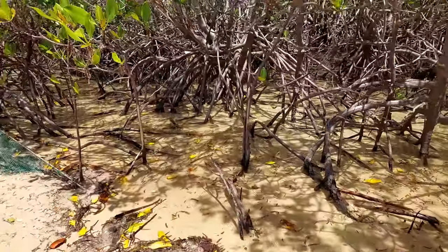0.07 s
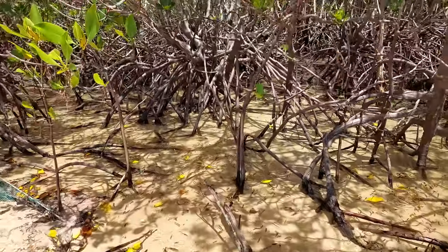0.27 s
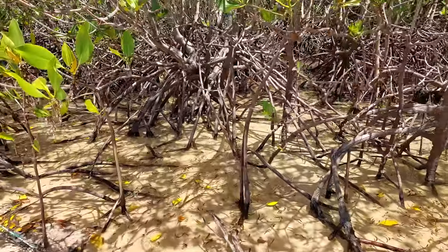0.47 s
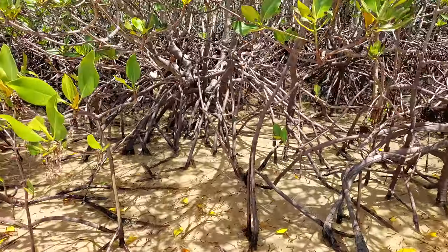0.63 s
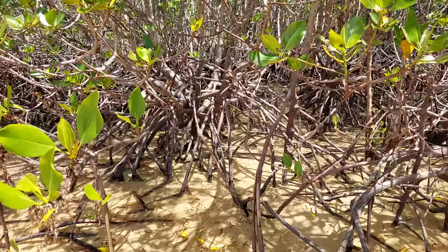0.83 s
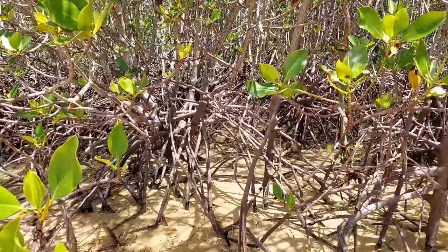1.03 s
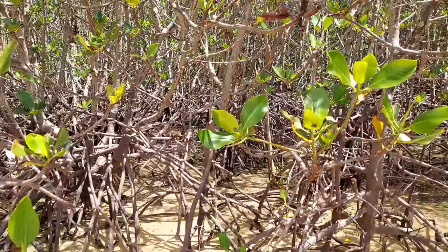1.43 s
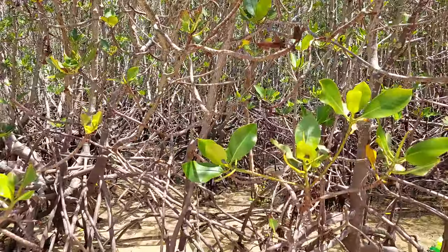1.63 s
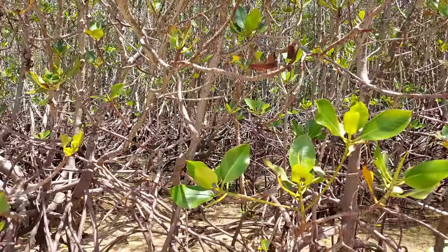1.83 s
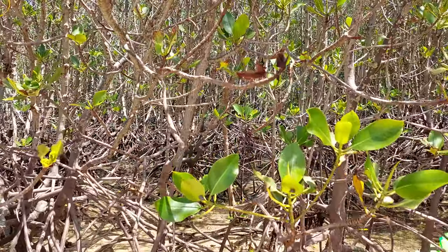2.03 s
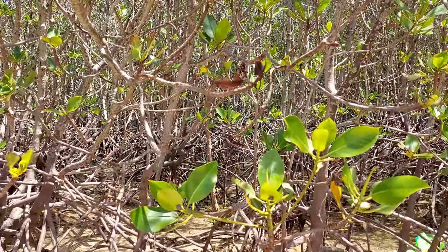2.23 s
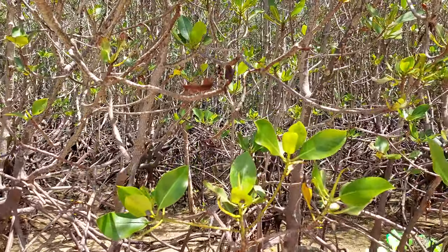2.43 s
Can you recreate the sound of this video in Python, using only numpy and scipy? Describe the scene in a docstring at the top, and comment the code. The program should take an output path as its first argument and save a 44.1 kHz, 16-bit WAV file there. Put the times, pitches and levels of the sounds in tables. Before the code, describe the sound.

Soft footsteps crunch on damp sand, landing with dull thuds at about 0.5 and 0.9 seconds. A sole slides at 1.4 seconds and a lighter step scuffs at 2.1, with dry leaves ticking and grit pattering underfoot. Insects hiss steadily over a faint distant wash. Low wind buffets the microphone on the right, strongest around 1.2 seconds, dying down by 2.5.

```python
"""A few soft steps on damp sand: each sole scuffs through the grains, two land with a thud, one slides.
The crunch is a sum of many tiny impacts; dry leaves tick underfoot and kicked-up grit patters down.
A mangrove thicket scatters these sounds, and insects hiss steadily in its trees over a distant wash.
Turbulent wind buffets the right microphone port and dies down at the end."""
import sys
import numpy as np
from scipy import signal
from scipy.fft import rfft, irfft
from scipy.io import wavfile
from scipy.ndimage import uniform_filter1d

SR = 44100
rng = np.random.default_rng(int(sys.argv[2]) if len(sys.argv) > 2 else 0)


def wav_record(signal):
    """Record a signal, one row per channel, as 16-bit PCM in the file named by sys.argv[1]."""
    frames = np.transpose(np.atleast_2d(signal))
    bounded = np.clip(frames, -1, 1)
    # unit amplitude maps onto the largest positive 16-bit level
    quanta = np.round(bounded * 32767).astype(np.int16)
    wavfile.write(sys.argv[1], SR, quanta)


N = 114660


def amp(db):
    """Amplitude ratio of a level in decibels."""
    return 10 ** (np.asarray(db) / 20)


def unit(x):
    """Normalisation to an rms of 1."""
    return x / np.sqrt(np.mean(x ** 2) + 1e-20)


def clock():
    """Time of each sample in seconds."""
    return np.arange(N) / SR


def freqs(size=N):
    """Bin frequencies in Hz, raised by 1 to keep their logarithm finite."""
    return np.fft.rfftfreq(size, 1 / SR) + 1


def contour(points):
    """Linear interpolation of (time, value) rows at each sample."""
    return np.interp(clock(), *np.transpose(points))


def arch(t, length):
    """A rounded envelope from time 0 to length."""
    return np.sqrt(abs(np.sin(np.pi * np.clip(t / length, 0, 1))))


def add(mix, start, sound):
    """Superposition of a sound on the mix from start seconds."""
    part = mix[:, max(round(start * SR), 0):][:, :sound.shape[1]]
    part += sound[:, :part.shape[1]]


def snippet(x, size):
    """A random stretch of x."""
    return x[:, rng.integers(N - size):][:, :size]


def colour(x, points, tilt_db=0):
    """Spectral shaping by (Hz, dB) rows and a tilt per octave, at unit rms."""
    hz, db = np.transpose(points)
    octave = np.log2(freqs())
    gain = amp(np.interp(octave, np.log2(hz), db) + tilt_db * octave)
    return unit(irfft(rfft(x) * gain, N))


def band(x, hz, width_hz):
    """Steep band-pass filtering, at unit rms."""
    size = x.shape[-1]
    detuning = 2 * (freqs(size) - hz) / width_hz
    return unit(irfft(rfft(x) / (1 + detuning ** 4), size))


def noise():
    """Two independent white noises."""
    return rng.standard_normal((2, N))


def pair(z, coherence):
    """Partial coherence from mixing two independent channels."""
    coherence = np.clip(coherence, -1, 1)
    return np.array([z[0], coherence * z[0] + np.sqrt(1 - coherence ** 2) * z[1]])


def wander(top_hz):
    """Low-pass noise: a random drift for each channel."""
    return unit(irfft(rfft(noise()) / (1 + (freqs() / top_hz) ** 4), N))


def grains(coherence, per_s=7000, spread_db=4, crossover_hz=4630):
    """Shot noise: random impacts whose coherence between the two ports falls in the treble."""
    strength = amp(spread_db * np.minimum(rng.exponential(1, (2, N)), 4))
    clicks = np.sign(noise()) * strength * (rng.random((2, N)) < per_s / SR)
    return irfft(pair(rfft(clicks), coherence / (1 + (freqs() / crossover_hz) ** 4)), N)


# Spectrum of the wash. Each row: frequency in Hz, relative density in dB.
WASH_SPECTRUM = [(20, -18), (60, -6), (150, 3.5), (300, -2.5), (500, -7), (800, -19), (1400, -26),
                 (2500, -29), (4000, -31.5), (10000, -50), (16000, -58)]
# Its slow swell. Each row: time in seconds, gain in dB.
WASH_SWELL = [(0, 1.5), (0.7, 1.5), (1.1, -1.5), (1.38, -2), (1.55, 0.5), (2.0, -.5), (2.3, 0.5), (2.6, -3)]
def wash(level_db=-54.5):
    """Far surf and air in the trees arrive as partly coherent noise, strongest in the bass."""
    return amp(level_db + contour(WASH_SWELL)) * colour(pair(noise(), coherence=0.58), WASH_SPECTRUM)


# Spectrum of the insect chorus. Each row: frequency in Hz, relative density in dB.
CHORUS_SPECTRUM = [(3000, -56), (4500, -23), (5100, -10.5), (5600, -3), (6050, -1), (6330, 1), (6600, -0.5),
                   (6800, -6.5), (7600, -4.5), (8600, -12.5), (9600, -26), (11200, -18.5), (12500, -5),
                   (13800, -19), (15800, -21.5)]
# Two nearer insects. Each row: pitch in Hz, bandwidth in Hz, level before modulation in dB.
SINGERS = [(6347, 39, -62), (6220, 27, -72)]
# Swell of all the insects. Each row: time in seconds, gain in dB.
CHORUS_SWELL = [(0, 0.5), (.7, -0.7), (1.1, 1.1), (1.6, -0.4), (2.2, -0.5), (2.6, -2)]
# Their balance: left gain in dB, right gain in dB.
CHORUS_SIDES_DB = [-4.5, -3]
def insects(chorus_db=-54.5, throb_hz=9.4, beat_at_s=1.03):
    """Many insects sum incoherently to a shrill hiss; amplitude modulation makes it throb and flicker."""
    chorus = amp(chorus_db) * colour(pair(noise(), coherence=0.035), CHORUS_SPECTRUM)
    singers = sum(amp(db) * band(noise(), hz, width) for hz, width, db in SINGERS)
    throb_db = 1.8 * np.cos(2 * np.pi * throb_hz * (clock() - beat_at_s))
    flicker_db = wander(top_hz=29.8)
    envelope = amp(contour(CHORUS_SWELL) + throb_db + flicker_db)
    return (chorus + singers) * envelope * amp(CHORUS_SIDES_DB)[:, None]


# Spectrum of the buffeting. Each row: frequency in Hz, relative density in dB.
BUFFET_SPECTRUM = [(12, -41), (24, -17), (32, -23), (45, -2), (65, 2), (100, -3.5), (145, -6.5),
                   (190, -20.5), (260, -21.5), (400, -36.5), (800, -48), (2000, -65)]
# Strength of the wind. Each row: time in seconds, relative level in dB.
GUSTS = [(0, -38.5), (0.15, -37.5), (0.19, -47.5), (0.41, -41.5), (0.53, -49.5), (0.65, -43.5), (0.75, -43),
         (0.84, -35.5), (0.89, -35), (1.06, -36.5), (1.17, -34), (1.269, -32), (1.33, -45), (1.49, -46),
         (1.6, -34.5), (1.68, -37.5), (1.75, -42.5), (1.98, -41.5), (2.11, -45), (2.23, -51.5), (2.4, -56),
         (2.47, -46.5), (2.6, -60.5)]
# Single eddies on the right port. Each row: time in seconds, envelope peak in dB, frequency in Hz.
EDDIES = [(0.135, -29, 201), (0.344, -20.5, 108), (0.693, -25, 67), (0.776, -20.5, 115),
          (0.832, -19.5, 94.3), (0.853, -18, 89), (1.048, -19, 83.6), (1.137, -18, 132), (1.226, -20, 98),
          (1.239, -9, 129), (1.250, -21, 185), (1.661, -22.5, 120), (1.821, -18.5, 81.4), (1.975, -25, 87)]
def wind(gain_db=6, flutter_db=2, eddy_cycles=0.68, leeward_db=-23.5):
    """Turbulence makes the pressure fluctuate at the ports; the left one lies in the lee."""
    rumble = colour(noise(), BUFFET_SPECTRUM)
    # Even out the noise so that the gusts and flutter set its level.
    rumble /= np.sqrt(uniform_filter1d(rumble ** 2, size=3000, axis=1) + 1e-6)
    rumble *= amp(gain_db + contour(GUSTS) + flutter_db * wander(top_hz=23.5))
    for at, peak_db, hz in EDDIES:
        cycles = (clock() - at) * hz
        envelope = amp(peak_db) * np.exp(-(cycles / eddy_cycles) ** 2)
        rumble[1] += envelope * np.sin(2 * np.pi * (cycles + rng.random()))
    return rumble * amp([[leeward_db], [0]])


def thicket(x, level_db=-10, t60=0.55):
    """Diffuse scattering from roots and trunks gives x a short, exponentially decaying tail."""
    tail = noise() * amp(-60 * clock() / t60)
    tail /= np.linalg.norm(tail[0])
    return amp(level_db) * signal.fftconvolve(x, tail, axes=1)[:, :N]


# Showers of grit. Each row: start in seconds, length in seconds, level in dB.
GRIT_SHOWERS = [(0.04, 0.14, -62.5), (.15, .2, -68), (.95, .13, -67.5), (2.098, .045, -64)]
def grit():
    """Fine grains kicked up by a sole fall back as sparse, bright shot noise."""
    patter = band(grains(coherence=0.87, per_s=900), hz=12600, width_hz=6800)
    return patter * sum(amp(db) * arch(clock() - start, length) for start, length, db in GRIT_SHOWERS)


# Ticks of leaves and twigs. Each row: start in seconds, level in dB, centre in Hz,
# bandwidth in Hz, 60 dB decay time in seconds.
LEAF_TICKS = [(0.079, -50, 14500, 3400, 0.063), (0.123, -57, 13200, 6000, .03),
              (0.453, -37.5, 14600, 4000, .011), (0.4635, -42, 15100, 2500, 0.018),
              (0.496, -42, 11800, 1800, 0.0075), (0.497, -47.5, 3080, 3000, 0.027),
              (0.815, -51.5, 6000, 3400, 0.068), (0.991, -47, 12000, 2500, 0.011),
              (1.017, -46, 1320, 1600, 0.011), (1.406, -52, 830, 706, 0.12),
              (1.694, -54.5, 2340, 2000, 0.023), (1.662, -42.5, 448, 60, 0.14),
              (2.358, -59, 2700, 1200, 0.076), (2.394, -44.5, 8500, 12000, 0.0089),
              (2.393, -52.5, 4260, 500, 0.031), (2.429, -55.5, 2120, 600, 0.085),
              (2.474, -49, 3870, 452, 0.032)]
# Rustles of leaves and shifting feet. Each row: start in seconds, length in seconds, level in dB,
# centre in Hz, bandwidth in Hz.
RUSTLES = [(0, 0.065, -57, 700, 2680), (0.055, 0.11, -62, 890, 2210), (0, 0.17, -68, 3860, 2650),
           (0.278, 0.33, -68, 3800, 2500), (0.382, 0.1, -61.5, 1510, 2520), (0.455, 0.019, -42, 2000, 1420),
           (2.105, 0.033, -48, 1600, 1550), (2.138, .035, -59.5, 1780, 1300),
           (0.501, 0.33, -67, 2300, 2070), (0.498, 0.34, -73.5, 4200, 1440), (0.955, 0.12, -56, 1550, 3580),
           (0.952, 0.13, -61.5, 5760, 9000), (1.441, 0.21, -69.5, 4150, 1430),
           (1.629, 0.26, -66, 2850, 4040), (2.34, 0.15, -66.5, 3400, 1230), (2.41, 0.2, -65.5, 2120, 4220),
           (2.495, 0.042, -62, 740, 260)]
def litter():
    """Dry leaves emit band-limited bursts; a tick's rise time is the reciprocal of its bandwidth."""
    out = np.zeros((2, N))
    snaps, crackle = pair(noise(), coherence=0.35), grains(coherence=0.56)
    t = clock()[:16384]
    for start, db, hz, width, t60 in LEAF_TICKS:
        envelope = np.minimum(t * width, 1) * amp(db - 60 * t / t60)
        add(out, start, envelope * band(snippet(snaps, len(t)), hz, width))
    for start, length, db, hz, width in RUSTLES:
        add(out, start, amp(db) * arch(t, length) * band(snippet(crackle, len(t)), hz, width))
    return out


# Course of the sliding sole. Each row: time in seconds, level in dB, centre in Hz.
SLIDE_PATH = [(1.402, -77, 800), (1.412, -57, 830), (1.44, -56.5, 1240), (1.475, -56, 1900),
              (1.51, -58.5, 2100), (1.56, -66.5, 2140), (1.66, -81, 2300)]
def slide(width_hz=1280):
    """Friction of grains under a sliding sole excites a rising resonance."""
    times, db, hz = np.transpose(SLIDE_PATH)
    carrier = np.exp(2j * np.pi * np.cumsum(np.interp(clock(), times, hz)) / SR)
    # Shifting down, low-passing and shifting back makes a moving band-pass.
    lowpass = signal.butter(2, width_hz / 2, fs=SR)
    swish = carrier * signal.lfilter(*lowpass, grains(coherence=0.87) / carrier)
    return unit(swish.real) * np.interp(clock(), times, amp(db), left=0, right=0)


# Spectrum of sand being packed. Each row: frequency in Hz, relative density in dB.
PACKING_SPECTRUM = [(100, -3), (300, 3.5), (800, -5.5), (1200, -14.5), (1900, -14.5), (2600, -25),
                    (3300, -19.5), (5000, -33), (16000, -30)]
# Impacts within the two landings. Each row: time in seconds, relative knock level in dB,
# knock pitch in Hz, relative crunch level in dB, crunch rise time constant in seconds.
IMPACTS = [(0.465, -23.5, 1780, -39.5, 0.0047), (0.4666, -26.5, 453, -43.5, 0.0015),
           (0.4716, -27.5, 330, -42, 0.0021), (0.9445, -22.5, 716, -38.3, 0.0046),
           (0.952, -26, 1420, -41.5, .003)]
# Their balance: left gain in dB, right gain in dB.
THUD_SIDES_DB = [2, 4.5]
def thuds(rise_cycles=0.24, decay_cycles=0.79, crunch_fall_s=0.0072):
    """Inelastic impact: a landing foot packs the sand, a heavily damped knock inside a dull crunch."""
    out = np.zeros((2, N))
    crunch = colour(grains(coherence=1.0), PACKING_SPECTRUM)
    t = clock()[:4096] - 0.04  # the crunch builds before the knock at t = 0
    for at, knock_db, hz, crunch_db, rise in IMPACTS:
        cycles = np.maximum(t, 0) * hz
        envelope = np.exp(-cycles / decay_cycles) * (1 - np.exp(-cycles / rise_cycles))
        knock = envelope * np.sin(2 * np.pi * cycles)
        packing = np.exp(np.minimum(t / rise, -t / crunch_fall_s)) * snippet(crunch, len(t))
        add(out, at + t[0], amp(knock_db) * knock + amp(crunch_db) * packing)
    return out * amp(THUD_SIDES_DB)[:, None]


# Spectrum of scuffed sand. Each row: frequency in Hz, relative density in dB.
SAND_SPECTRUM = [(150, -29), (400, 5), (650, 2), (1000, 4.5), (2100, 1), (3000, -2.5), (4500, -4),
                 (7500, -5), (9700, -16), (12500, -13.5), (15000, -13)]
# Scuffs of the soles. Each row: start in seconds, rise in seconds, 60 dB decay time in seconds,
# level in dB, tilt in dB per octave, left minus right level in dB.
SCUFFS = [(0.423, 0.013, 0.24, -43, .5, -1), (0.880, 0.025, 0.19, -43, 0, 0),
          (2.099, 0.015, 0.19, -47, .1, -1.5)]
def scuffs(settle_db=-18.5, settle_t60=1, judder_db=0.5):
    """Granular friction: a sole crunches in unevenly, then sand keeps trickling under the weight."""
    out, sand = np.zeros((2, N)), grains(coherence=0.87)
    t = clock()[:SR]
    for start, rise, t60, db, tilt_db, pan_db in SCUFFS:
        since_peak = np.maximum(t - rise, 0)
        crunch = amp(-60 * since_peak / t60)
        settling = amp(settle_db - 60 * since_peak / settle_t60)
        envelope = np.minimum(t / rise, 1) * (crunch + settling)
        sides = amp([[db + pan_db / 2], [db - pan_db / 2]])
        add(out, start, sides * envelope * colour(sand, SAND_SPECTRUM, tilt_db)[:, :SR])
    return out * amp(-judder_db * wander(top_hz=122)[0])


def scene():
    """Superposition of the steps, their scattered sound, insects, wash and wind."""
    steps = scuffs() + thuds() + slide() + litter() + grit()
    return steps + thicket(steps) + insects() + wash() + wind()


def record(dry):
    """Band limiting: a linear-phase low-pass filter removes the highest treble."""
    taps = signal.firwin(511, cutoff=15780, window=("kaiser", 9), fs=SR)
    return signal.oaconvolve(dry, taps[None], "same")


dry = scene()
out = record(dry)
wav_record(out)
```